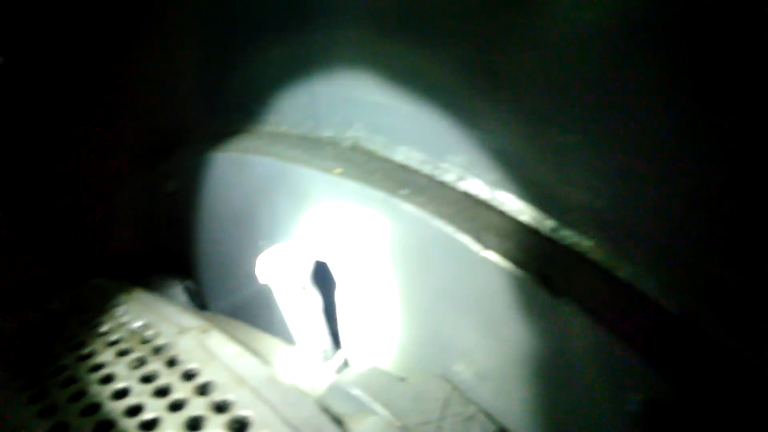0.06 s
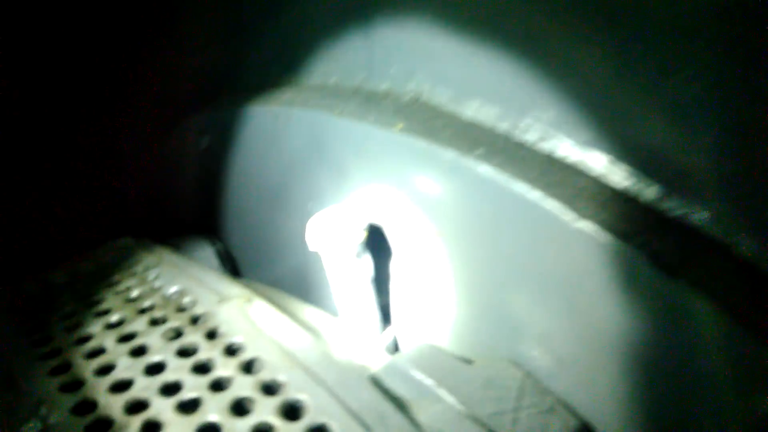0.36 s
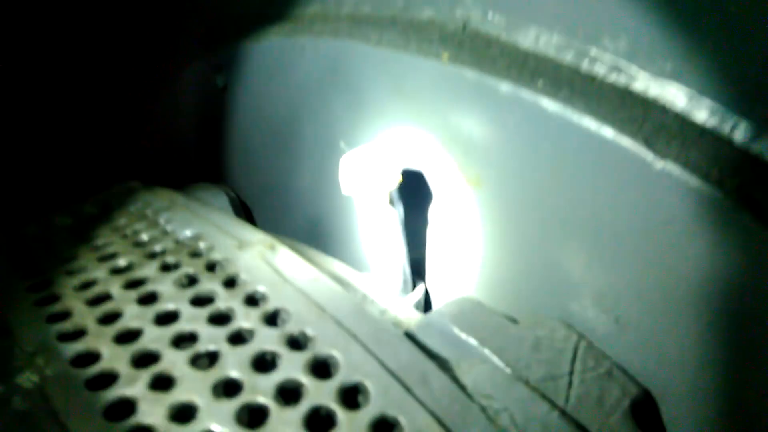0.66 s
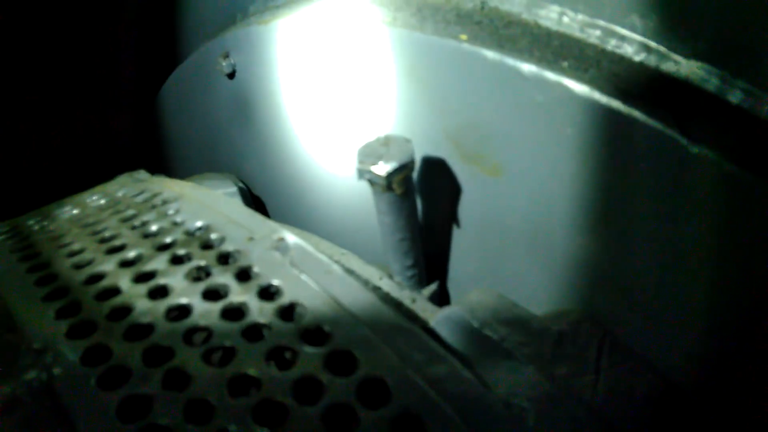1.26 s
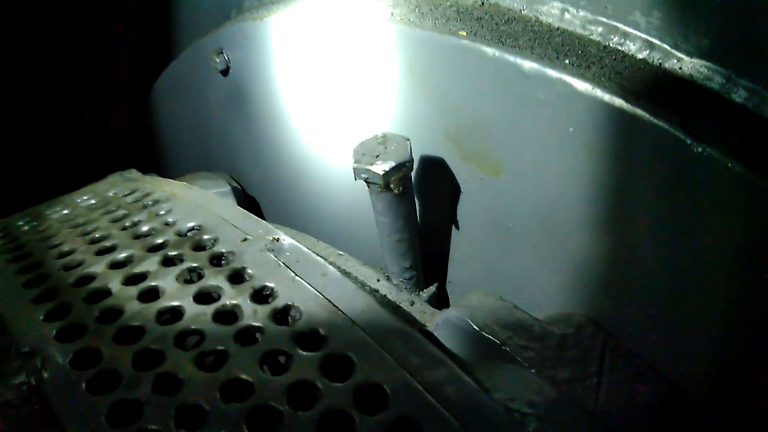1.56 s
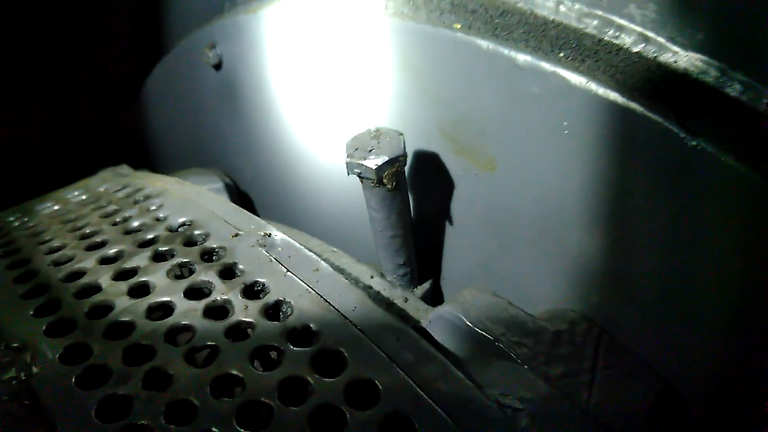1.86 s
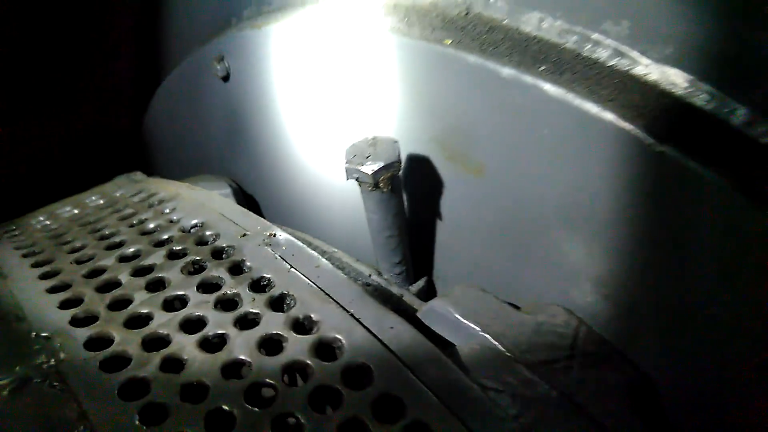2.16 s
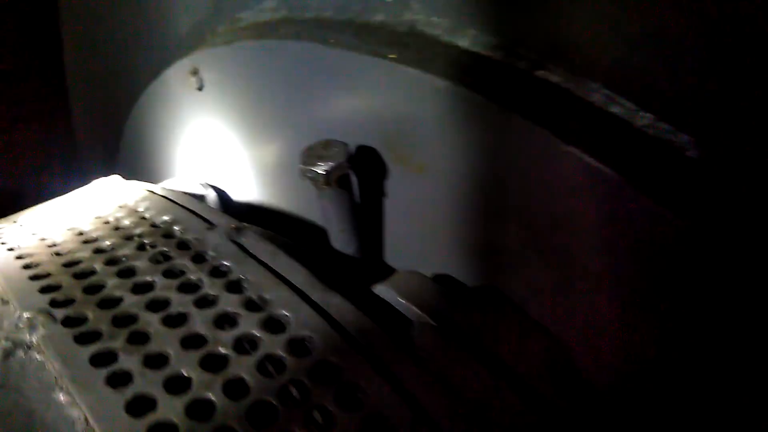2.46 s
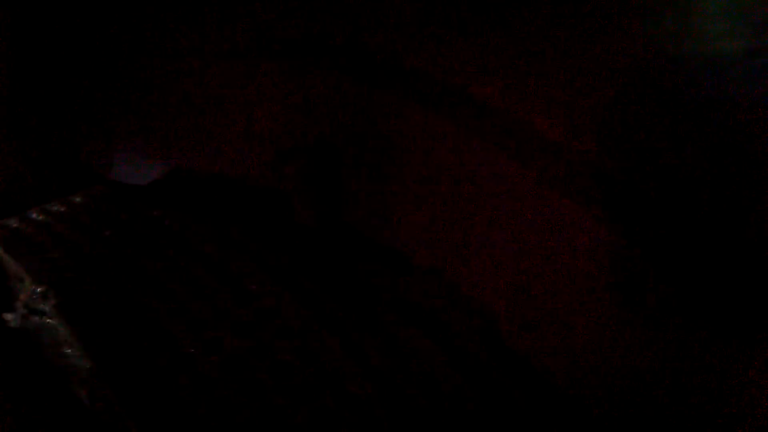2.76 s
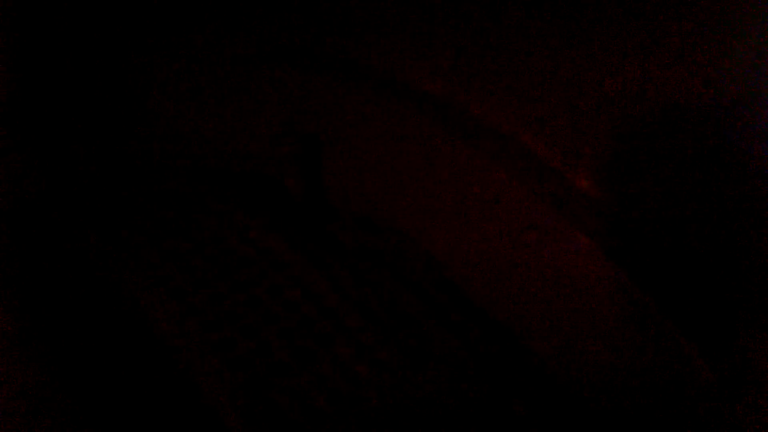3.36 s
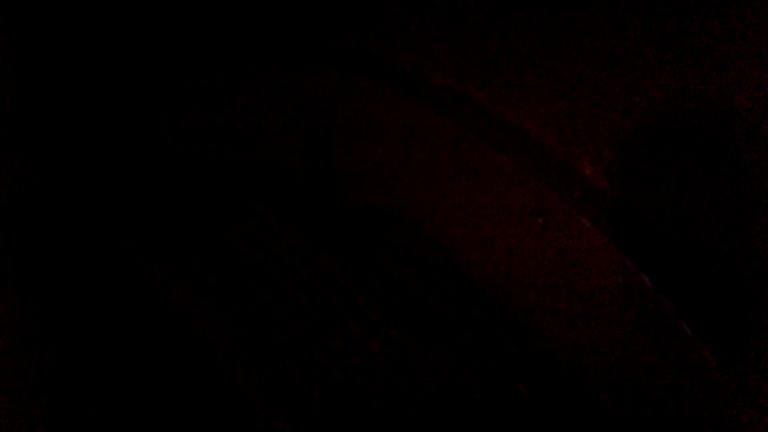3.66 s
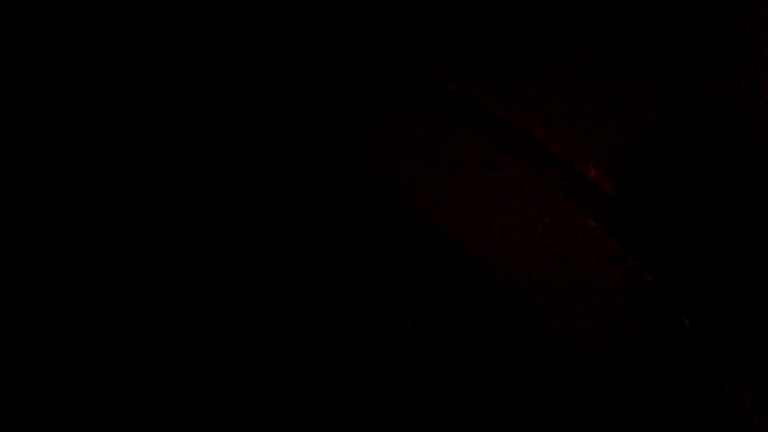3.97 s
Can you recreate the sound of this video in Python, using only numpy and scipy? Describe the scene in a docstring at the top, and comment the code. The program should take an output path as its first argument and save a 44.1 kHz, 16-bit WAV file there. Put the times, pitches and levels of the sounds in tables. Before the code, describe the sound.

A worn fan bearing knocks, rumbles and squeaks in a slow rhythm inside a metal cabinet.

```python
"""A ruined bearing knocks and rumbles as a big fan rotor turns, about once in 0.8 s, in a steel cabinet.
Each turn the rollers cross the damaged part of the race and ring the housing, the dragging shaft
groans, and the dry metal squeaks by stick-slip. Rollers scrape and ping in between,
over a thin rubbing whistle and a steady hum and hiss."""
import sys
import numpy as np
from scipy import signal
from scipy.fft import rfft, irfft
from scipy.io import wavfile
from scipy.ndimage import uniform_filter1d

SR = 44100
rng = np.random.default_rng(int(sys.argv[2]) if len(sys.argv) > 2 else 0)


def log_audio(samples):
    """Write samples as a 16-bit WAV file to the path given in sys.argv[1]."""
    # one column per channel
    frames = np.atleast_2d(samples).T
    # limit to full scale, then quantise
    limited = np.clip(frames, -1, 1)
    pcm = np.round(limited * 32767).astype(np.int16)
    wavfile.write(sys.argv[1], SR, pcm)


N = 176400
T = np.arange(N) / SR

# roller drops: start_s, level_db
ROLLER_DROPS = [(-.06, -21), (0.41, -28), (.451, -19), (.545, -18.5), (.629, -22), (1.147, -28),
                (1.245, -16.5), (1.296, -26.5), (1.332, -20), (1.972, -17), (2.074, -24), (2.205, -30),
                (2.477, -34), (2.729, -21), (2.845, -20), (2.891, -26.5), (2.938, -29), (3.52, -25),
                (3.634, -17), (3.699, -25), (3.735, -25), (3.861, -28)]
# housing modes: freq_hz, gain_db, t60_s
HOUSING_MODES = [(124.8, -9.5, 0.35), (169.96, -3.5, 0.5), (197.5, -10, 0.63), (230.9, -6, 0.53),
                 (270.04, -1.5, 0.47), (299.8, -6.5, 0.4), (342.14, -2, 0.28), (408, -17.5, 0.38),
                 (439, -18, 0.082), (508, -15.5, 0.35), (545.6, -17.5, 0.38)]
# cabinet boom: freq_hz, density_db
BOOM_SPECTRUM = [(20, -67), (33, -40), (58, -41), (95, -11), (165, -4.5), (215, -3), (270, 4.5), (345, -6),
                 (378, -23), (430, -7.5), (560, -14.5), (630, -19.5), (720, -18.5), (820, -31),
                 (1300, -36.5), (2500, -65), (6000, -85)]
# blows on the steel guard: start_s, level_db
GUARD_HITS = [(.449, -42), (.543, -34.5), (1.15, -46.5), (1.245, -42.5), (2.838, -40.5)]
# guard modes: freq_hz, gain_db, t60_s
GUARD_MODES = [(691, 6, 0.087), (759, -1, 0.18), (738, -5, 0.08), (890, -13.5, 0.097), (1110, -15, 0.016),
               (1415, -14.5, 0.076)]


def knocks(rise_s=0.0067, boom_fall_s=0.051, clack_fall_s=0.0053):
    """Rollers drop into the damage: housing ring, cabinet boom, dull clack. Some clank the guard."""
    clack_spectrum = [(300, 5.5), (700, -5), (850, -8), (1400, -10), (2500, 0.5), (8000, -43)]
    ring = struck(blows(ROLLER_DROPS), HOUSING_MODES)
    boom = bursts(ROLLER_DROPS, rise_s, boom_fall_s) * steadied(noise(BOOM_SPECTRUM), span_s=0.0193)
    clack = bursts(ROLLER_DROPS, rise_s, clack_fall_s) * noise(clack_spectrum)
    clank = struck(blows(GUARD_HITS), GUARD_MODES)
    return pan(db=0.9) * (ring + amp(-6) * boom) + amp(-29) * clack + pan(db=1) * amp(2) * clank


# rough stretch under load, once a turn: peak_s, level_db
ROUGH_PASSES = [(-.15, -28.5), (0.599, -30.5), (1.304, -28.5), (2.097, -28.5), (2.879, -33.5), (3.7, -36)]


def rumble(pits_per_s=220, swell_s=0.12, ebb_s=0.25, floor_db=-55, throb_hz=21.5, throb_db=-2):
    """Rollers run over small pits with a quick throb, harder as the rough stretch takes the load."""
    load = amp(floor_db)
    for peak_s, db in ROUGH_PASSES:
        load = load + amp(db) * np.exp(-np.maximum((peak_s - T) / swell_s, (T - peak_s) / ebb_s))
    pits = rng.standard_normal(N) * (rng.random(N) < pits_per_s / SR)
    ring = steadied(struck(pits, HOUSING_MODES)[None], span_s=0.28)
    boom = steadied(noise(BOOM_SPECTRUM), span_s=0.042) * flutter(depth_db=2, rate_hz=35)
    throb = unit_rms(amp(throb_db * np.sin(2 * np.pi * throb_hz * T)))
    return pan(db=0.3) * load * throb * (amp(-2) * ring + amp(-5) * boom)


# shaft drags: start_s, level_db, length_s
SHAFT_DRAGS = [(-.1, -48.5, .22), (0.632, -46, 0.17), (1.398, -45, 0.21), (2.099, -45.5, .19),
               (2.902, -53.5, 0.16), (3.713, -52, 0.21)]
# sustained housing modes: freq_hz, gain_db
GROAN_MODES = [(272, 5.5), (549, -1)]


def groans(rise_s=0.028, fall_s=0.071, waver_hz=3, shudder_db=2):
    """The dragging shaft holds the housing in a hollow note."""
    out = np.zeros((2, N))
    t = np.arange(SR // 2) / SR
    for start_s, db, length_s in SHAFT_DRAGS:
        drag = held(t, length_s, rise_s, fall_s)
        for hz, mode_db in GROAN_MODES:
            pitch_hz = hz + waver_hz * wander(len(t), rate_hz=14)
            tone = np.sin(2 * np.pi * np.cumsum(pitch_hz) / SR)
            gain = amp(db + mode_db + shudder_db * wander(len(t), rate_hz=25))
            add(out, start_s, pan(db=-3) * gain * drag * tone)
    return out


def stick_slip(hz, length_s, rise_s, fall_s, jitter_hz, jitter_rate_hz, t60_s, wet_db,
               rasp_db=-20, rasp_hz=400, drop_hz=0, settle_s=0.00593, chatter_db=1, modes=()):
    """Unsteady metal tone with rasp and echo, peak RMS 1. Pitch falls by drop_hz as the metal bites."""
    t = np.arange(SR // 4) / SR
    n = len(t)
    pitch_hz = hz + drop_hz * np.exp(-t / settle_s) + jitter_hz * wander(n, jitter_rate_hz)
    phase = 2 * np.pi * np.cumsum(pitch_hz) / SR
    grip = held(t, length_s, rise_s, fall_s) * amp(chatter_db * wander(n, jitter_rate_hz))
    rasp = unit_rms(wander(n, rasp_hz) * np.sin(phase) + wander(n, rasp_hz) * np.cos(phase))
    tone = cabinet(grip * (np.sin(phase) + amp(rasp_db) * rasp), t60_s, wet_db)
    tone = tone + sum(amp(db) * resonate(tone, mode_hz, width_hz) for mode_hz, width_hz, db in modes)
    power = uniform_filter1d(tone ** 2, size=700, axis=1)
    return tone / np.sqrt(power.max(1, keepdims=True))


# dry slips: start_s, level_db, pitch_hz, length_s
DRY_SLIPS = [(-.01, -31.5, 7260, 0.032), (0.102, -24.5, 7160, 0.026), (0.198, -32, 7140, 0.014),
             (0.493, -35, 7310, 0.024), (0.7, -27.5, 7330, 0.031), (0.811, -22.5, 7270, 0.035),
             (0.886, -35, 7200, 0.047), (1.039, -41, 7550, 0.022), (1.217, -32, 7410, 0.0082),
             (1.305, -40.5, 7400, 0.041), (1.438, -25.5, 7150, 0.016), (1.552, -23.5, 7300, 0.035),
             (1.972, -35, 7400, 0.011), (2.196, -28, 7410, 0.036), (2.32, -24, 7310, 0.03),
             (2.434, -24, 7200, 0.02), (2.764, -36.5, 7450, 0.012), (3.007, -25, 7270, 0.016),
             (3.13, -19.5, 7100, 0.02), (3.169, -26.5, 7180, 0.035), (3.245, -24.5, 7080, 0.014),
             (3.696, -42, 7280, .04), (3.836, -27.5, 7260, 0.048), (3.973, -20.5, 7160, 0.042)]
# bearing ring modes: freq_hz, width_hz, gain_db
RACE_MODES = [(7156, 75, 3), (7335, 70, 4)]
# ring mode near the octave: freq_hz, width_hz, gain_db
RACE_OCTAVE_MODES = [(14100, 350, 13)]


def squeaks(note_db=-8, octave_db=-45):
    """Dry stick-slip sets the bearing ring singing, hard right; the faint octave is more central."""
    notes, octaves = np.zeros((2, 2, N))
    stroke = dict(rise_s=0.0075, fall_s=0.0061, jitter_hz=89.5, jitter_rate_hz=266, t60_s=0.31)
    for start_s, db, hz, length_s in DRY_SLIPS:
        note = stick_slip(hz, length_s, **stroke, wet_db=-1, rasp_db=1.5, rasp_hz=315,
                          drop_hz=556, modes=RACE_MODES)
        octave = stick_slip(2 * hz, length_s, **stroke, wet_db=2, rasp_db=7, rasp_hz=450,
                            modes=RACE_OCTAVE_MODES)
        add(notes, start_s, amp(db + note_db) * note)
        add(octaves, start_s, amp(db + octave_db) * octave)
    return pan(db=-19) * notes + pan(db=-6) * octaves


# brief metal-on-metal slips: start_s, level_db, pitch_hz
BRIEF_SLIPS = [(0.03, -41, 6330), (.3, -42.5, 6390), (0.733, -38, 6450), (1.025, -49, 6450),
               (1.288, -43.5, 9100), (1.466, -43, 6450), (2.046, -44.5, 9220), (2.228, -39.5, 6420),
               (2.84, -40.5, 9130), (3.028, -41.5, 6430), (3.375, -44, 6440), (3.865, -41, 6460),
               (3.913, -52, 9250)]


def pings(gain_db=1):
    """Brief slips sound other modes of the bearing."""
    out = np.zeros((2, N))
    for start_s, db, hz in BRIEF_SLIPS:
        ping = stick_slip(hz, length_s=0.0043, rise_s=0.003, fall_s=0.0041, jitter_hz=40,
                          jitter_rate_hz=210, t60_s=0.12, wet_db=-2, rasp_db=-12, rasp_hz=260)
        add(out, start_s, amp(db + gain_db) * ping)
    return pan(db=-14) * out


# roller skids: start_s, level_db, centre_hz
HIGH_SKIDS = [(.148, -59, 9560), (.858, -55, 9500), (1.61, -60, 9400), (2.376, -56.5, 9550),
              (2.769, -55, 9260), (3.189, -50.5, 9240)]


def scratches():
    """Skidding rollers give high, almost pitchless scratches."""
    out = np.zeros((2, N))
    for start_s, db, hz in HIGH_SKIDS:
        skid = stick_slip(hz, length_s=0.016, rise_s=0.0051, fall_s=0.01, jitter_hz=150,
                          jitter_rate_hz=220, t60_s=0.43, wet_db=4, rasp_db=10, rasp_hz=420)
        add(out, start_s, amp(db) * skid)
    return pan(db=2.5) * out


# roller scrapes: start_s, level_db
ROLLER_SCRAPES = [(0.026, -42), (0.0683, -44), (0.1503, -44), (0.236, -45), (0.361, -50.5), (0.412, -47.5),
                  (0.537, -43), (0.5866, -48.5), (0.732, -42), (0.8463, -40.5), (0.954, -43), (1.1353, -48),
                  (1.253, -46.5), (1.314, -46.5), (1.466, -42), (1.607, -47.5), (1.699, -45.5),
                  (1.765, -46), (1.8856, -50), (1.9755, -42), (2.075, -44), (2.2283, -45), (2.292, -44),
                  (2.381, -42.5), (2.4778, -46.5), (2.5146, -44.5), (2.8125, -46), (2.8695, -43.5),
                  (3.028, -45), (3.189, -48), (3.291, -46.5), (3.7025, -45.5), (3.865, -47)]
# scrape noise: freq_hz, density_db
SCRAPE_SPECTRUM = [(800, -17.5), (2000, -5), (3200, -10.5), (4200, -5.5), (4800, 3.5), (5400, 0), (6400, 3),
                   (7400, 7.5), (8000, 0), (8800, -4.5), (9600, -15), (12500, -31), (16000, -28)]


def scrapes(gain_db=-1):
    """Rollers scrape along the race in short gritty rasps."""
    envelope = amp(gain_db) * bursts(ROLLER_SCRAPES, rise_s=0.0018, fall_s=0.049)
    return pan(db=-9) * envelope * noise(SCRAPE_SPECTRUM) * flutter(depth_db=1.5, rate_hz=300)


# rubbing envelope: time_s, level_db
RUB_LEVELS = [(0.13, -62), (0.3, -51), (0.49, -53.5), (0.53, -50), (1.1, -58), (1.21, -56), (1.38, -54),
              (1.92, -48), (2.44, -59.5), (2.71, -54), (2.8, -54), (2.93, -53), (3.0, -48.5), (3.56, -51),
              (4.0, -54.5)]
# rubbing whistle: freq_hz, density_db
WHISTLE_SPECTRUM = [(5000, -32.5), (7700, -13.5), (8380, -16), (8480, -7), (8540, 0.5), (8610, -10),
                    (8685, 0), (8780, -13), (8930, -9), (9300, -24), (11000, -72)]
# lower whine, about every second turn: start_s, level_db, pitch_hz, length_s
RUB_WHINES = [(1.173, -46, 8060, 0.11), (2.601, -46, 8080, 0.11), (3.946, -51, 8300, 0.041)]


def rubbing(gain_db=1):
    """Steady rubbing gives a fuzzy whistle that swells and fades, with an occasional lower note."""
    whistle = unit_rms(cabinet(noise(WHISTLE_SPECTRUM), t60_s=0.096, wet_db=2)[:, :N])
    envelope = amp(gain_db + np.interp(T, *np.transpose(RUB_LEVELS)))
    out = envelope * whistle * flutter(depth_db=2, rate_hz=90)
    for start_s, db, hz, length_s in RUB_WHINES:
        whine = stick_slip(hz, length_s, rise_s=0.021, fall_s=0.0087, jitter_hz=70,
                           jitter_rate_hz=330, t60_s=0.19, wet_db=1)
        add(out, start_s, amp(db) * whine)
    return pan(db=-6.5) * out


# hum and hiss: freq_hz, density_db
AIR_SPECTRUM = [(20, -48), (32, -27), (44, -3.5), (62, 11.5), (85, 1), (125, 9.5), (250, 1.5), (500, -12.5),
                (800, -17.5), (1200, -22), (1450, -25), (1650, -20), (2000, -25.5), (2420, -23),
                (3000, -27.5), (4600, -22.5), (5600, -28), (7400, -23.5), (8800, -34), (9800, -34),
                (11300, -37), (12600, -31), (13500, -32), (14400, -39.5), (16000, -36)]
# their balance: freq_hz, left_minus_right_db
AIR_BALANCE = [(30, -2), (250, 3.5), (1000, 4), (3000, 2.5), (5000, -2), (7500, -16), (10000, 6.5),
               (16000, -7)]


def air(level_db=-44, drift_db=3.05):
    """Low hum and hiss in the cabinet, wavering in level."""
    return amp(level_db + drift_db * wander(N, rate_hz=8)) * noise(AIR_SPECTRUM, AIR_BALANCE)


# left-right likeness: freq_hz, correlation
STEREO_CORRELATION = [(30, 1), (300, 0.91), (500, 0.52), (1000, 0), (3000, 0), (16000, 0.063)]


def noise(spectrum, balance=None):
    """Unit-RMS stereo noise from (freq_hz, density_db) points; sides alike in the bass only."""
    hz = np.fft.rfftfreq(N, 1 / SR)
    left, independent = rfft(rng.standard_normal((2, N)))
    correlation = np.clip(log_interp(STEREO_CORRELATION, hz), -1, 1)
    right = correlation * left + np.sqrt(1 - correlation ** 2) * independent
    bins = np.array([left, right]) * amp(log_interp(spectrum, hz))
    if balance:
        bins = bins * amp(np.outer([.5, -.5], log_interp(balance, hz)))
    return unit_rms(irfft(bins, N))


def cabinet(x, t60_s, wet_db):
    """Direct sound plus dense echoes off the steel walls, different at each ear."""
    t = np.arange(SR // 3) / SR
    walls = rng.standard_normal((2, len(t))) * amp(-60 * t / t60_s)
    walls *= amp(wet_db) / np.linalg.norm(walls[0])
    walls[:, 0] += 1
    return signal.fftconvolve(np.atleast_2d(x), walls, axes=1)


def struck(force, modes):
    """A body's decaying modes, rung by a train of blows."""
    t = np.arange(SR // 2) / SR
    ring = sum((-1) ** k * amp(db - 60 * t / t60_s) * np.sin(2 * np.pi * hz * t)
               for k, (hz, db, t60_s) in enumerate(modes))
    return signal.oaconvolve(force, ring / abs(ring).max())[:N]


def resonate(x, hz, width_hz):
    """Unity-gain resonance."""
    radius = np.exp(-np.pi * width_hz / SR)
    pole = radius * np.exp(2j * np.pi * hz / SR)
    return 2 * signal.lfilter([1 - radius], [1, -pole], x).real


def blows(events):
    """One impulse per event."""
    force = np.zeros((1, N))
    for start_s, db in events:
        add(force, start_s, amp([[db]]))
    return force[0]


def bursts(events, rise_s, fall_s):
    """Envelope of quick rises and exponential falls, summed in power."""
    power = sum((amp(db) * held(T - start_s, 0, rise_s, fall_s)) ** 2 for start_s, db in events)
    return np.sqrt(power)


def held(t, length_s, rise_s, fall_s):
    """Linear rise; exponential fall from length_s on."""
    return np.clip(t / rise_s, 0, 1) * np.exp(-np.maximum(t - length_s, 0) / fall_s)


def wander(count, rate_hz):
    """Unit-RMS random drift, low-passed at rate_hz."""
    rolloff = 1 + (np.fft.rfftfreq(count, 1 / SR) / rate_hz) ** 4
    return unit_rms(irfft(rfft(rng.standard_normal(count)) / rolloff, count))


def flutter(depth_db, rate_hz):
    """Randomly flickering gain, unit RMS."""
    return unit_rms(amp(depth_db * wander(N, rate_hz)))


def steadied(x, span_s):
    """Flattens level swings slower than span_s."""
    power = uniform_filter1d((x ** 2).mean(0), max(int(span_s * SR), 2))
    return x / np.sqrt(abs(power) + 1e-12)


def add(mix, start_s, sound):
    """Mixes a sound in, cropped to the mix."""
    at = round(start_s * SR)
    sound = sound[:, max(-at, 0):]
    part = mix[:, max(at, 0):][:, :sound.shape[1]]
    part += sound[:, :part.shape[1]]


def pan(db):
    """Stereo gains for a left-minus-right level."""
    return unit_rms(amp([[db / 2], [-db / 2]]))


def log_interp(points, hz):
    freq_hz, value = np.transpose(points)
    return np.interp(np.log(hz + 1), np.log(freq_hz + 1), value)


def amp(db):
    return 10 ** (np.asarray(db) / 20)


def unit_rms(x):
    return x / np.sqrt(np.mean(x ** 2) + 1e-20)


def scene():
    """Low bearing noise, high friction sounds, background air."""
    bearing = knocks() + rumble() + groans()
    friction = squeaks() + pings() + scratches() + scrapes() + rubbing()
    return bearing + friction + air()


def record(dry):
    """Steep low-pass on the top treble."""
    cutoff_hz = 15750
    lowpass = signal.firwin(511, cutoff_hz, window=("kaiser", 9), fs=SR)
    return signal.oaconvolve(dry, lowpass[None], "same")


dry = scene()
out = record(dry)
log_audio(out)
```